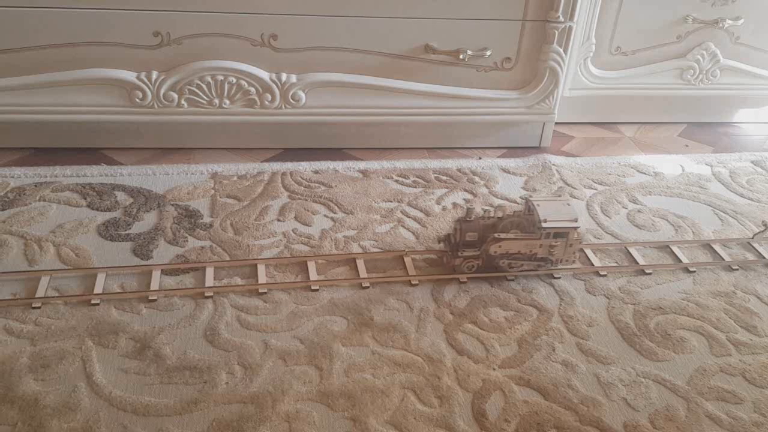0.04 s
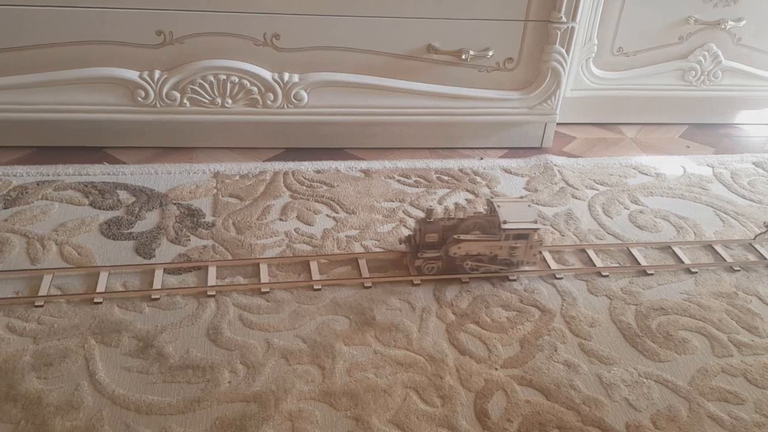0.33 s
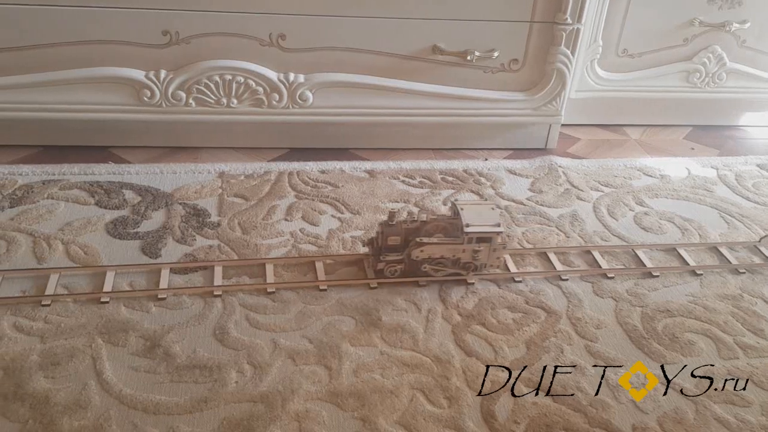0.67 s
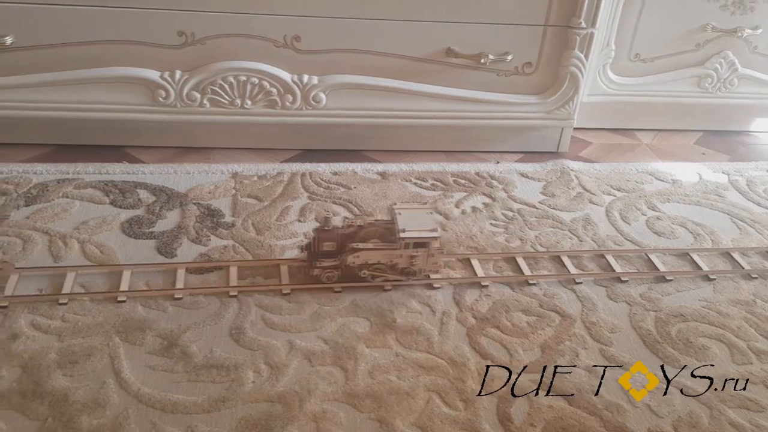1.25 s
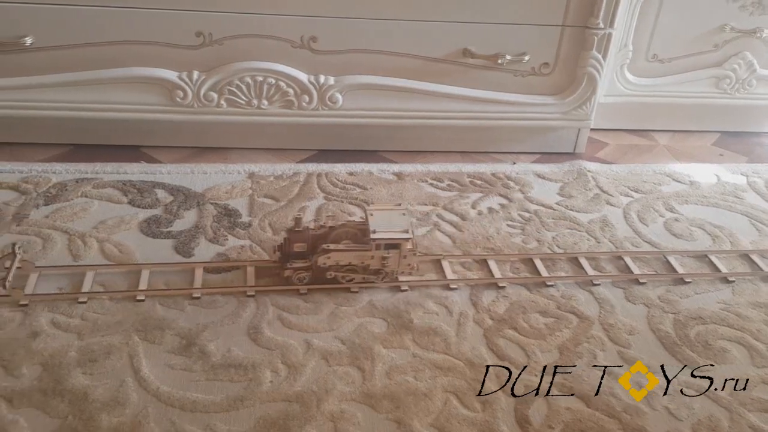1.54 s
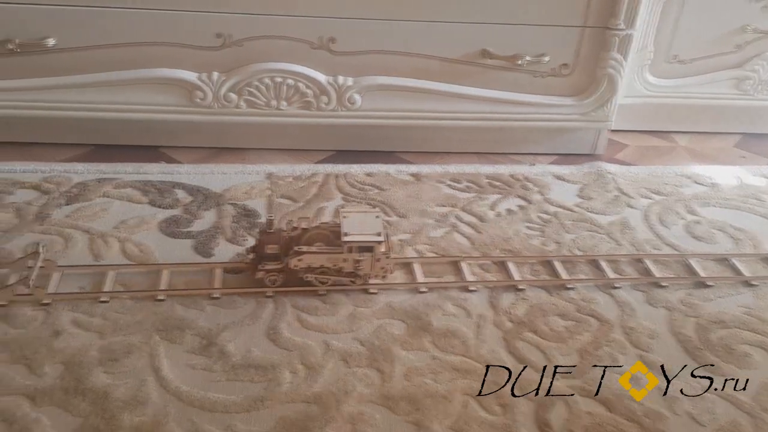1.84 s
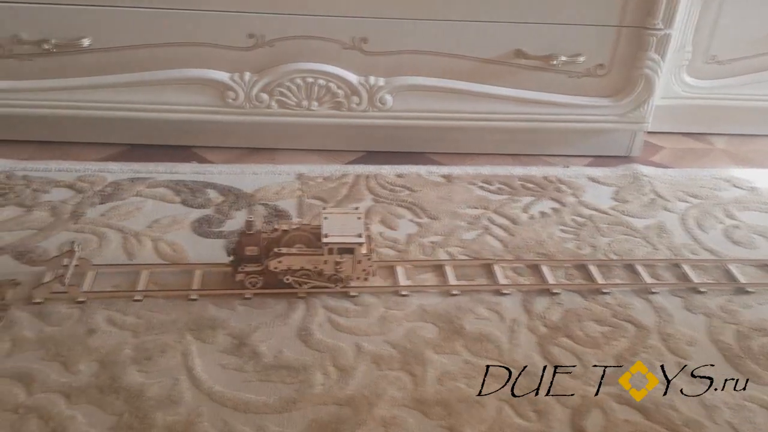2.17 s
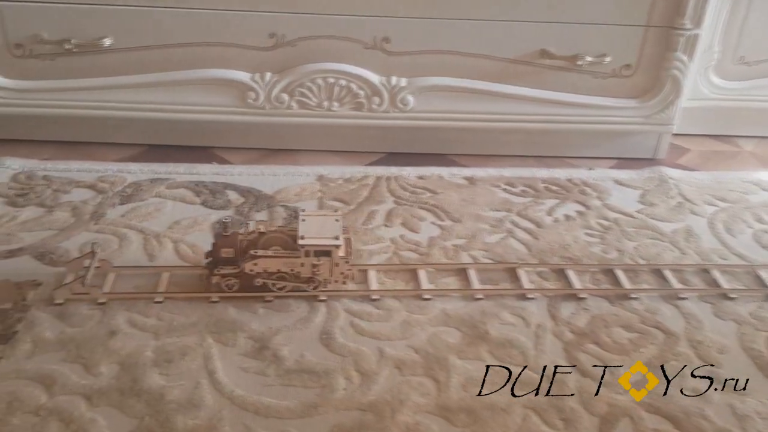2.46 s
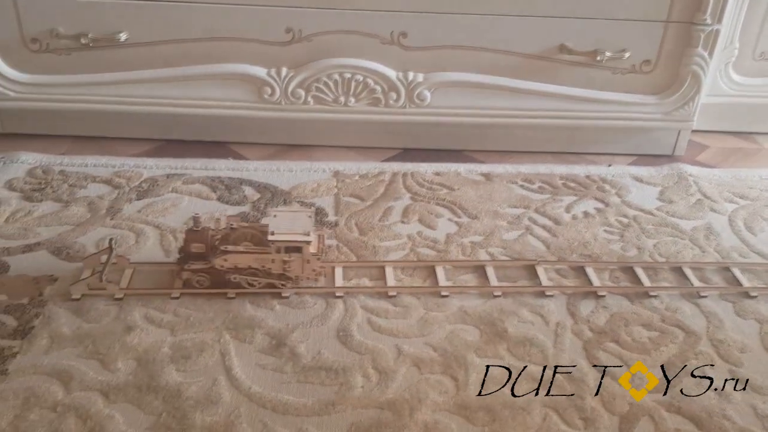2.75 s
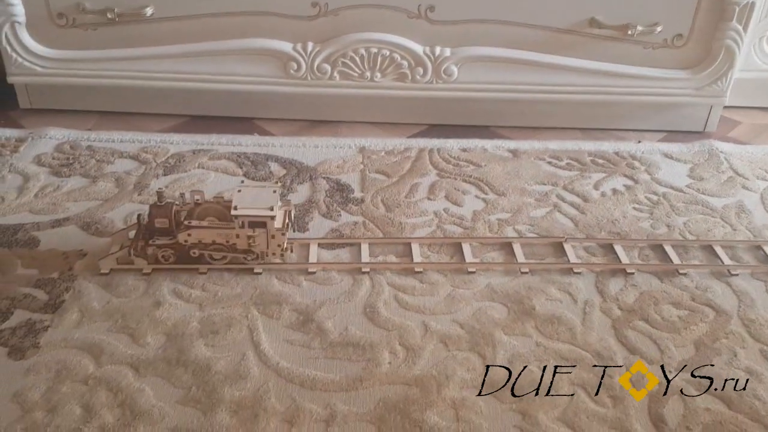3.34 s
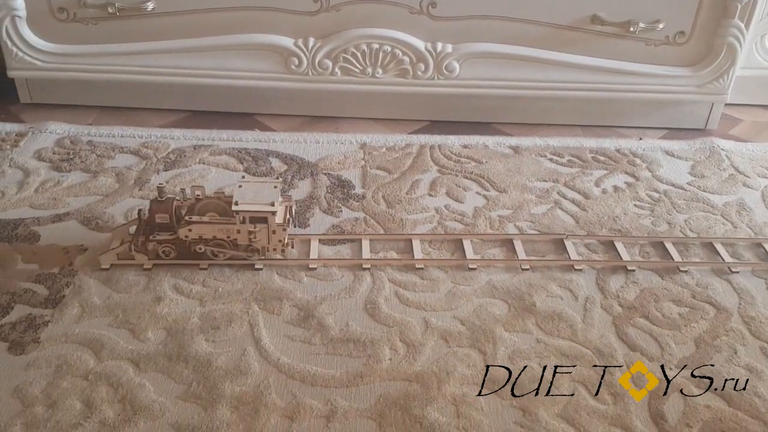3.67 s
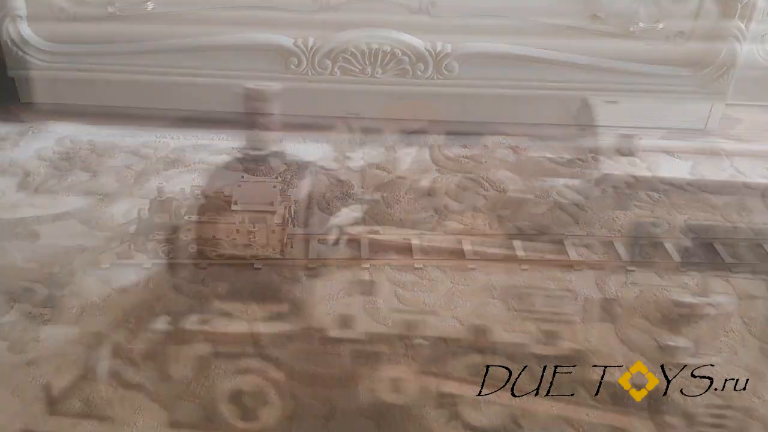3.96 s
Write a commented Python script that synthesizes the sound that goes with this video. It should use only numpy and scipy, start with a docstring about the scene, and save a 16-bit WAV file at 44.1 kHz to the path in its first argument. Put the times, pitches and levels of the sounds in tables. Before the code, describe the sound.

Whirring, rapidly ticking gears of a wooden toy locomotive rolling past indoors.

```python
"""You hear the whir and tick of a wind-up wooden toy locomotive, running along a wooden track
on a carpet in a furnished room. Its plywood gear teeth strike in step with a fast shaft,
loose parts chatter, and these blows make the frame ring. Now and then a tooth snaps,
an axle whines or a wheel scrapes. Underneath, the wheels rumble softly. Low booms and deep,
dull bumps come mostly near the end of the run, where the engine gives one short squeak."""
import sys
import numpy as np
from scipy import signal
from scipy.fft import rfft, irfft, next_fast_len
from scipy.io import wavfile
from scipy.ndimage import map_coordinates

SR = 44100
rng = np.random.default_rng(int(sys.argv[2]) if len(sys.argv) > 2 else 0)


def output_pcm(signal):
    """Save a mono or channel-first signal as 16-bit PCM at the path in sys.argv[1].

    Samples are clipped to [-1, 1] before scaling.
    """
    pcm = np.clip(np.atleast_2d(signal).T, -1, 1) * 32767
    wavfile.write(sys.argv[1], SR, np.round(pcm).astype(np.int16))


N = 176400

# Low booms and deep, dull bumps.
# Each row: middle in seconds, length in seconds, pitch in Hz, level in dB.
LOW_BOOMS_AND_BUMPS = [(0.139, 0.14, 168.3, -53), (1.2, 0.21, 248, -57.5), (2.81, 0.16, 158, -53),
                       (3.104, 0.5, 160.2, -58), (3.421, 0.29, 45.2, -53.5), (4.0, .16, 48, -52)]
# The tone of the rolling wheels. Each row: frequency in Hz, relative level in dB.
RUMBLE_TONE = [(20, -29), (50, -9.5), (130, -10), (260, -6), (360, -1), (490, -2), (620, -9.5),
               (2000, -27.5)]
# Rough and smooth spots on the rails. Each row: time in seconds, boost or cut in dB.
RAIL_SPOTS = [(.79, -18), (1.333, 7), (1.47, -10), (1.56, 4.5), (1.74, 4.5), (2.02, 5.5), (2.48, 6.5),
              (3.27, -7), (3.44, 4.5), (3.97, 4.5)]
# Brief wheel scrapes. Each row: time in seconds, frequency in Hz, level in dB.
WHEEL_SCRAPES = [(.248, 6700, -34.5), (3.247, 11500, -33.5)]
# When the axle whines. Each entry: time in seconds.
WHINE_TIMES = [.9, 1.18, 1.53, 1.71, 1.9, 2.22, 2.34, 3.05, 3.25]
# Sharp snaps of the gears. Each row: time in seconds, strength in dB.
GEAR_SNAPS = [(0.5562, -10), (1.276, -14), (1.99, -18), (2.262, -22), (2.3272, -12)]
# How fast the shaft spins. Each row: time in seconds, speed in turns per second.
SHAFT_SPEED = [(.12, 26.7), (.62, 25), (.85, 26), (1.45, 24.1), (2.05, 31.4), (2.3, 26), (2.6, 25),
               (3.1, 31.7), (3.65, 28.4), (4, 25)]
# The tone of the ticks. Each row: frequency in Hz, relative level in dB.
TICK_TONE = [(700, -29.5), (2000, -5.5), (4000, -5), (6700, -1.5), (7200, -4), (8600, -1), (13400, -1),
             (15000, -12.5), (15700, -3.5)]
# Bands of ticking that stand out for a while. Each row: frequency in Hz, width in Hz,
# relative level in dB, strongest moment in seconds, spread in seconds.
TICK_BANDS = [(2395, 90, -1.5, 0.67, 0.84), (3890, 200, -3.5, 0.91, 0.63), (6630, 1000, -1, 0.13, 0.44),
              (6296, 770, -5, 2.34, 0.55), (5400, 300, -2, 0.99, 0.73), (4920, 310, -2.5, 1.54, 0.86),
              (4230, 400, -2.5, 2.87, 0.52), (10670, 1700, 1.5, 1.64, 1.0), (11400, 830, -5.5, 3.5, 0.48)]
# How the ticking rises and falls. Each row: time in seconds, gain in dB.
TICK_GAIN = [(0.14, -41), (0.3, -40.5), (2.31, -41), (2.69, -41.5), (3.09, -38), (3.2, -40.5), (3.4, -38),
             (3.86, -40), (4.0, -34.5)]
# The notes the plywood frame rings at. Each row: pitch in Hz, width in Hz, relative level in dB.
FRAME_NOTES = [(1174, 42, -11.5), (1445, 25, -2.5), (1559, 33, 0), (1728, 14.4, -1.5), (1870, 108, -0.5),
               (2122, 99, -2), (2238, 46, 1.5), (2371, 56, -0.5), (2744, 83, 0.9), (2886, 26, 0.5),
               (3404, 224, -5), (3744, 53, -0.5), (4190, 19, -8)]
# The gears press harder and the frame rings louder. Each row: time in seconds, strength in dB.
GEAR_SURGES = [(.25, 6), (.48, 4), (.99, 4), (1.22, 2.5), (2.335, 0.5), (2.45, 2.5), (3.05, 2.5)]
# The tone of knocking wood. Each row: frequency in Hz, relative level in dB.
WOOD_TONE = [(300, -56), (800, -25.5), (1300, -13.5), (2200, 0.5), (2900, -4), (3120, -6.5), (3450, -5),
             (5550, -8), (5850, -17.5), (15000, -55.5)]
# How loud the whir is. Each row: time in seconds, level in dB.
WHIR_LEVEL = [(0.14, -33.2), (1.07, -31), (1.14, -34), (1.18, -31.5), (1.46, -33), (1.73, -31), (1.77, -34),
              (1.89, -30.5), (1.93, -33), (1.98, -30), (2.04, -33.7), (2.1, -31), (3.93, -32), (4.0, -27.8)]
# Where the engine is. Each row: time in seconds, left ear's delay in ms, left level over right in dB.
ENGINE_PATH = [(.12, 0.062, 0.5), (1.4, -0.0023, 2), (3.2, -0.054, 2)]


def amp(db):
    """Turn decibels into a number to multiply by."""
    return 10 ** (np.asarray(db) / 20)


def unit(x):
    """Scale a sound to an average (rms) level of 1."""
    return x / np.sqrt(np.mean(x ** 2) + 1e-20)


def curves(rows):
    """Join a table's points with straight lines: one curve for each column after the time."""
    times, *columns = np.transpose(rows)
    return [np.interp(np.arange(N) / SR, times, column) for column in columns]


def swells(rows, half_s):
    """A rounded hump for each (time, height) row."""
    return sum(height * np.exp(-((np.arange(N) / SR - s) / half_s) ** 2) for s, height in rows)


def wobble(per_s):
    """A smooth curve through per_s random points a second."""
    return map_coordinates(rng.standard_normal(int(N * per_s / SR) + 4), [np.arange(N) * per_s / SR])


def filtered(x, response):
    """Filter x; response gives the gain and phase at each frequency."""
    size = 2 * next_fast_len(N // 2 + SR // 4)
    return irfft(rfft(x, size) * response(np.fft.rfftfreq(size, 1 / SR)), size)[..., :N]


def resonance(f, hz, width_hz):
    """How something that rings at hz answers a shake at frequency f."""
    return 1j * f * width_hz / (hz * hz - f * f + 1j * f * width_hz)


def band(x, hz, width_hz):
    """Keep the part of x near hz, scaled to level 1."""
    return unit(filtered(x, lambda f: resonance(f, hz, width_hz) ** 2))


def coloured(x, tone):
    """Shape x with a tone table, then scale it to level 1."""
    hz, db = np.transpose(tone)
    def response(f):
        gain = amp(np.interp(np.log(f + 1), np.log(hz + 1), db))
        cepstrum = irfft(np.log(gain))
        middle = len(cepstrum) // 2
        # Folding this in half makes the filter ring after a blow, never before it.
        cepstrum[1:middle] *= 2
        cepstrum[middle + 1:] = 0
        return np.exp(rfft(cepstrum))
    return unit(filtered(x, response))


def dying(power, decay_s):
    """Give each bit of energy a fading tail."""
    keep = np.exp(-2 / (decay_s * SR))
    return signal.lfilter([1 - keep], [1, -keep], power)


def radiate(power, apart_db, near_db, room_db, near_s=0.024, room_s=0.064):
    """Blows become noise with near and room echoes; apart_db sets how much the two ears differ."""
    heard = power + amp(near_db) ** 2 * dying(power, near_s) + amp(room_db) ** 2 * dying(power, room_s)
    return np.sqrt(heard) * (rng.standard_normal(N) + amp(apart_db) * rng.standard_normal((2, N)))


def contacts(samples, size_db, scrape_s):
    """The power of blows at the given samples, each a short fading scrape; it averages 1."""
    blows = np.bincount(np.clip(samples, 0, N).astype(int), amp(size_db) ** 2, N + 1)[:N]
    power = dying(blows, scrape_s)
    return power / power.mean()


def chatter(count, scatter_db, scrape_s):
    """Loose parts touch at random moments."""
    samples = rng.uniform(0, N, count)
    return contacts(samples, scatter_db * np.clip(rng.standard_normal(count), -2, 2), scrape_s)


def gear_teeth(per_turn, swing_db, alternate_db, scatter_db, jitter_s, scrape_s):
    """Teeth strike in step with the shaft, harder on one side of it and on every second tooth."""
    turns = np.cumsum(curves(SHAFT_SPEED)[0]) / SR
    strikes = np.flatnonzero(np.diff(np.floor(turns * per_turn)))
    size, late = np.clip(rng.standard_normal((len(strikes), 2)), -2, 2).T
    size_db = swing_db * np.cos(2 * np.pi * turns[strikes]) + scatter_db * size
    size_db += alternate_db * (np.arange(len(strikes)) % 2)
    return contacts(strikes + late * jitter_s * SR, size_db, scrape_s)


def low_booms_and_bumps():
    """Each boom or dull bump is a low tone that swells and fades with a little rumble around it."""
    t = np.arange(N) / SR
    out = np.zeros(N)
    for s, length_s, hz, db in LOW_BOOMS_AND_BUMPS:
        rumble = amp(-6) * band(rng.standard_normal(N), hz, width_hz=80)
        tone = np.sin(2 * np.pi * (hz * t + rng.random()))
        swell = np.cos(np.pi * np.clip((t - s) / length_s, -.5, .5)) ** 2
        out += amp(db) * swell * (tone + rumble)
    return out


def wheels():
    """Rolling wheels set the body humming unevenly; rough spots knock and smooth ones go quiet."""
    touches = chatter(count=3000, scatter_db=0, scrape_s=0.0045)
    rolling = radiate(touches, apart_db=-5, near_db=-14, room_db=-9)
    rumble = coloured(rolling, RUMBLE_TONE)
    hum = band(rolling, hz=470, width_hz=75) * amp(-7 + 3 * wobble(per_s=10))
    hollow = filtered(rumble, lambda f: resonance(f, hz=380, width_hz=280))
    push = amp(swells(RAIL_SPOTS, half_s=0.044))
    return amp(-58) * (rumble + (push - 1) * hollow + push * hum)


def wheel_scrapes():
    """A wheel rubs for an instant with a bright rasp."""
    rub = rng.standard_normal((2, N))
    return sum(band(rub, hz, width_hz=1800) * swells([(s, amp(db))], half_s=0.014)
               for s, hz, db in WHEEL_SCRAPES)


def squeak(at_s=3.97, hz=1085, fall_hz_per_s=1000):
    """One short falling squeak as the engine reaches the end of the track."""
    t = np.arange(N) / SR - at_s
    phase = 2 * np.pi * (hz * t - fall_hz_per_s * t ** 2 / 2)
    return np.sin(phase) * swells([(at_s, amp(-46))], half_s=0.042)


def axle_whine(hz=1455, waver_hz=14):
    """A dry axle sings thinly, on and off."""
    phase = 2 * np.pi * np.cumsum(hz + waver_hz * wobble(per_s=25)) / SR
    return np.sin(phase) * swells([(s, amp(-41)) for s in WHINE_TIMES], half_s=0.032)


def gear_snaps():
    """Now and then a tooth catches and lets go."""
    power = np.zeros(N)
    for s, db in GEAR_SNAPS:
        power[round(s * SR)] = amp(db) ** 2
    snaps = radiate(dying(power, decay_s=0.0018), apart_db=4, near_db=0, room_db=-5.5)
    return filtered(snaps, lambda f: resonance(f, hz=4700, width_hz=11000))


def gear_ticking(pulse_above_hz=8000):
    """Fast gears and loose parts tick. The tone shifts on the way; the top bands pulse once a turn."""
    teeth = gear_teeth(per_turn=12, swing_db=10, alternate_db=6, scatter_db=1.5,
                       jitter_s=0.00016, scrape_s=0.0012)
    loose = chatter(count=2800, scatter_db=6.5, scrape_s=0.00056)
    ticks = radiate(amp(-11) * teeth + loose, apart_db=16, near_db=5, room_db=0.5)
    pulsing = radiate(teeth + loose, apart_db=18, near_db=-10, room_db=-22)
    rasping = radiate(loose, apart_db=-1.5, near_db=0.5, room_db=-11)
    out = amp(3.5) * coloured(ticks, TICK_TONE)
    for hz, width_hz, db, s, spread_s in TICK_BANDS:
        swell = np.exp(-.5 * ((np.arange(N) / SR - s) / spread_s) ** 2)
        out += amp(db) * swell * band(pulsing if hz > pulse_above_hz else rasping, hz, width_hz)
    return amp(curves(TICK_GAIN)[0]) * out


def plywood_frame(f, skew_radians=0.26, low_cut_hz=1000):
    """The frame rings at its own notes, each reaching the two ears slightly out of step."""
    ears = np.array([[1j], [-1j]])
    notes = sum(amp(db) * resonance(f, hz, width_hz) * np.exp(ears * skew_radians * (-1) ** k)
                for k, (hz, width_hz, db) in enumerate(FRAME_NOTES))
    return notes * (f / (f + 1j * low_cut_hz)) ** 2


def gear_whir():
    """Teeth and loose parts shake the frame; when the gears press harder, one panel rings out."""
    teeth = gear_teeth(per_turn=6, swing_db=-3.5, alternate_db=1.5, scatter_db=3,
                       jitter_s=0.0007, scrape_s=0.0019)
    power = teeth + amp(7) * chatter(count=4200, scatter_db=3.5, scrape_s=0.00029)
    shaking = radiate(power, apart_db=-3.5, near_db=3, room_db=-2)
    surge = amp(swells(GEAR_SURGES, half_s=0.04))
    frame = unit(filtered(shaking, plywood_frame)) * np.sqrt(surge)
    panel = amp(0.5) * (surge - 1) * band(shaking, hz=2380, width_hz=130)
    ring = unit(frame + panel)
    knock = coloured(radiate(power, apart_db=5, near_db=-7, room_db=4), WOOD_TONE)
    return unit(ring + knock) * amp(curves(WHIR_LEVEL)[0])


def scene():
    """The engine passes the listener from right to left."""
    engine = (gear_whir() + axle_whine() + squeak() + gear_ticking() + gear_snaps()
              + wheel_scrapes() + wheels() + low_booms_and_bumps())
    delay_ms, balance_db = curves(ENGINE_PATH)
    shift = delay_ms * SR / 1000
    return np.array([map_coordinates(ear, [np.arange(N) - side * shift], order=5) * amp(side * balance_db)
                     for ear, side in zip(engine, (.5, -.5))])


def record(dry, start_s=0.12, top_hz=15830):
    """The sound starts suddenly and has nothing above top_hz."""
    return filtered(dry * (np.arange(N) / SR > start_s), lambda f: f < top_hz)


dry = scene()
out = record(dry)
output_pcm(out)
```